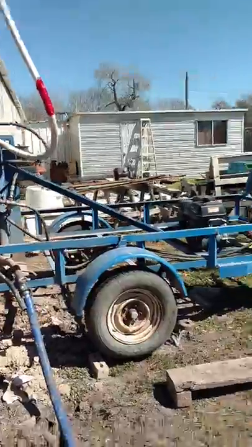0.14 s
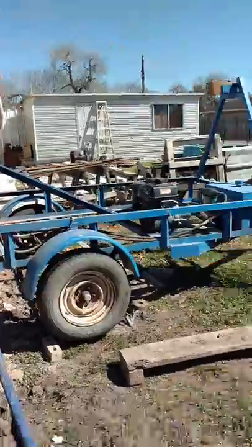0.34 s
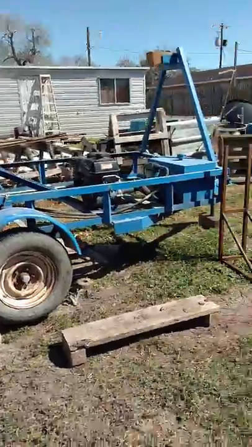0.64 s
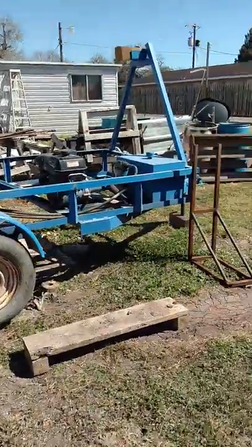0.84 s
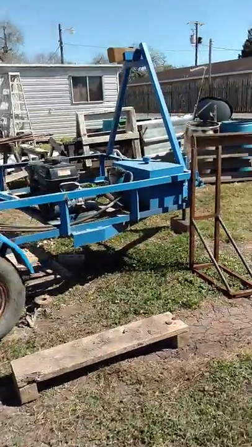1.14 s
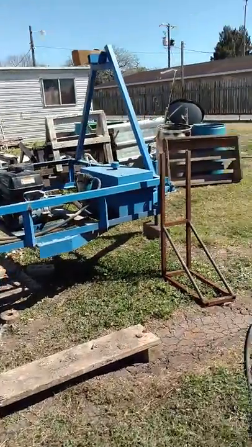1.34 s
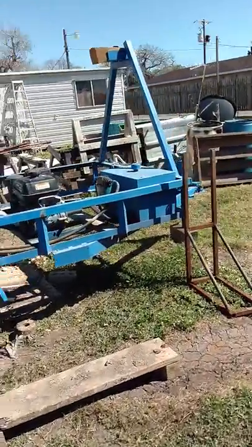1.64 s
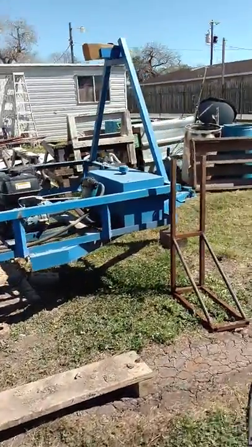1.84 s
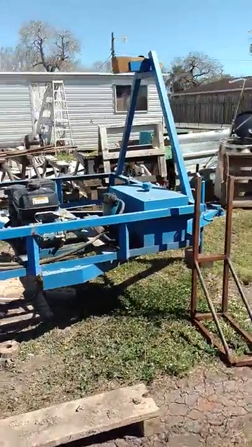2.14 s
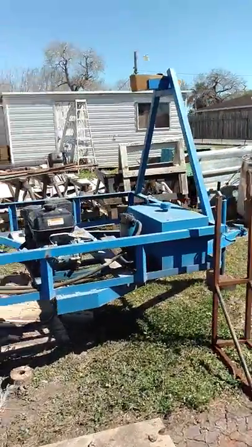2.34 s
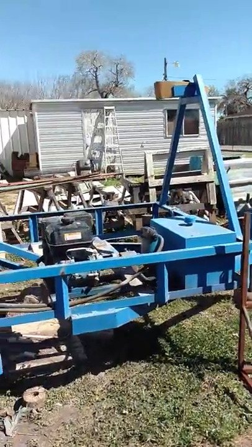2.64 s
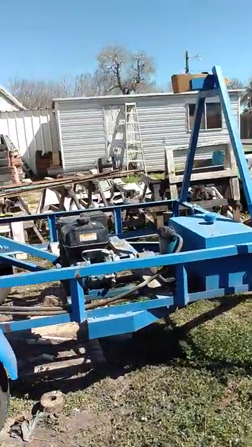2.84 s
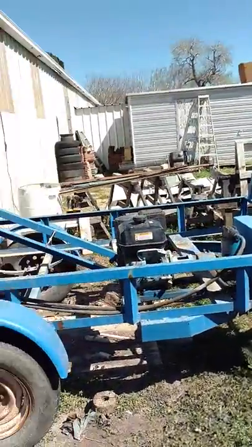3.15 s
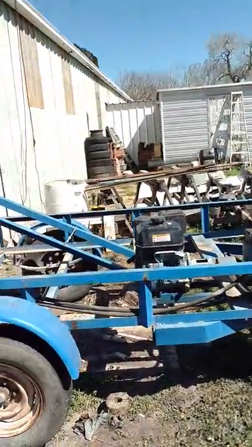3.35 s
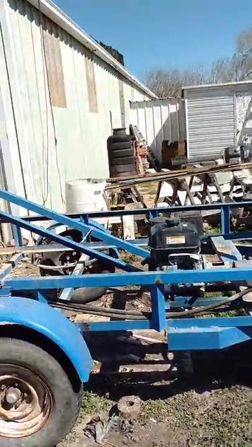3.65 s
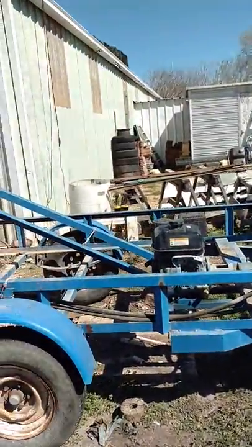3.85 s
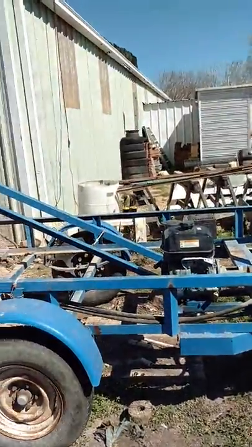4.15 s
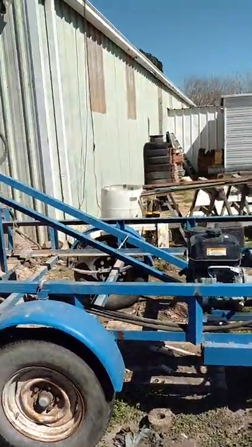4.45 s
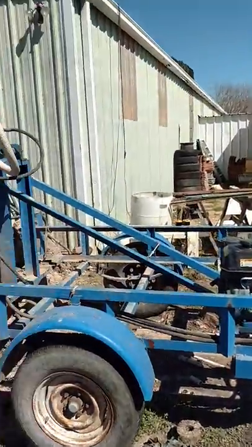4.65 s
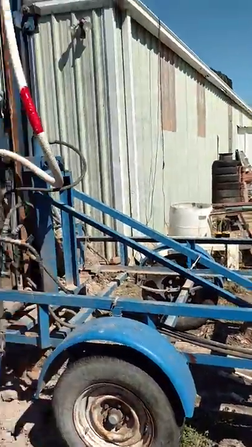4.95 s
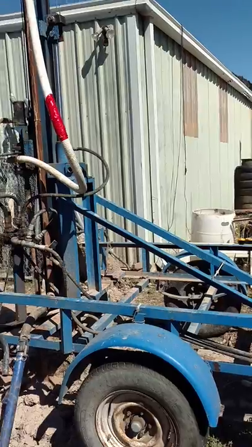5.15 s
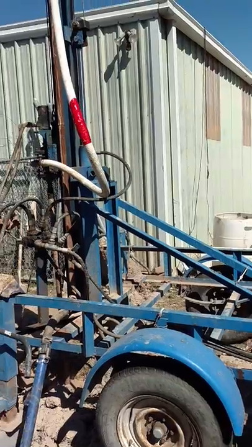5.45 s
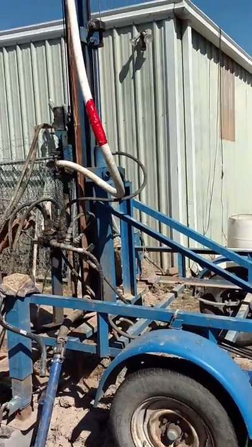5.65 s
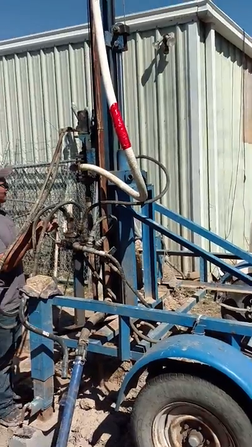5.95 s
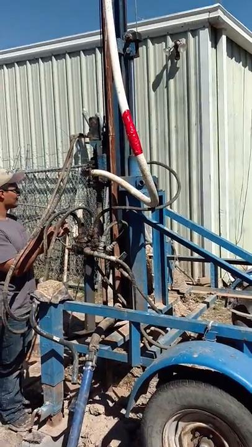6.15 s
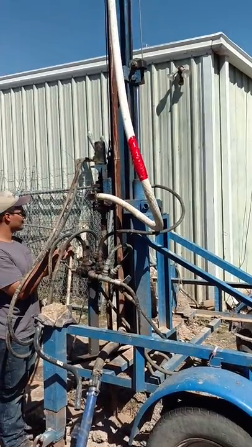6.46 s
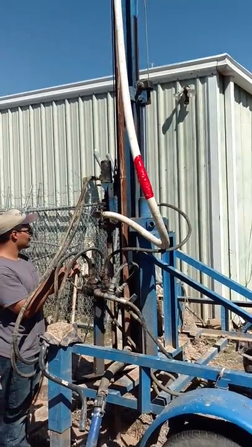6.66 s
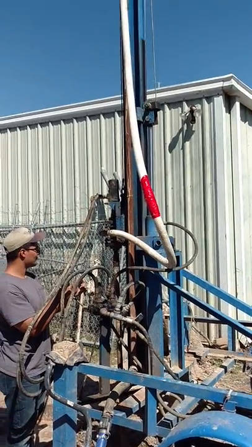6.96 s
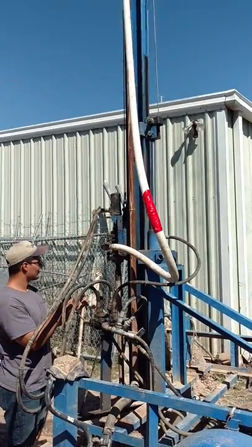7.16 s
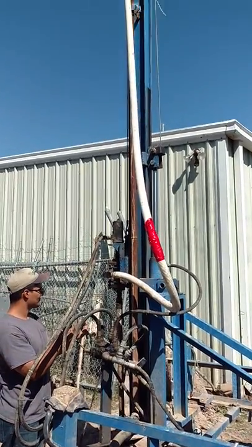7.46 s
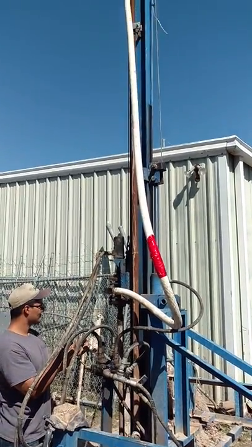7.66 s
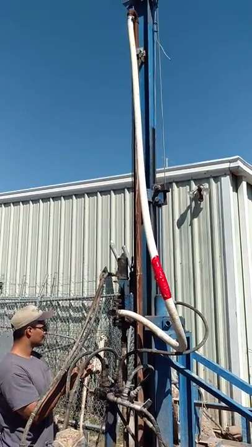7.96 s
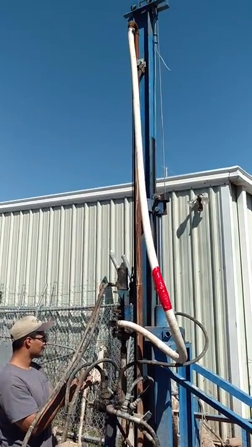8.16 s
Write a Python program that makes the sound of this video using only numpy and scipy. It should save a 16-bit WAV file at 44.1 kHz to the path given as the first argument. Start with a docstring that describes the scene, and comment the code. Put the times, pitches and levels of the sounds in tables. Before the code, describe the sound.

A drilling rig's petrol engine and slower pump engine throb and rattle together without pause in a yard, growing louder and more ringing mid-way, then easing slightly.

```python
"""Two engines of a home-made drilling rig chug, beat, knock and hiss in a yard, with a few steel clinks.
A single-cylinder petrol engine drives the hydraulics at about 3200 rpm; a slower one is likely the mud pump's.
Exhausts are sums of firing harmonics; the pump casing is a bank of struck resonances.
Gas flow, clatter and hiss are coloured noise pulsed by exhaust puffs and valve ticks.
The microphone is carried from the front of the trailer towards the mast, which moves levels, colour and width."""
import sys
import numpy as np
from scipy import signal
from scipy.fft import rfft, irfft, next_fast_len
from scipy.io import wavfile

SR = 44100
rng = np.random.default_rng(int(sys.argv[2]) if len(sys.argv) > 2 else 0)


def generate_wav(signal):
    """Clip the signal to [-1, 1] and save it as 16-bit WAV at the path in sys.argv[1]."""
    frames = np.transpose(np.atleast_2d(signal))
    scaled = np.clip(frames, -1, 1) * 32767
    pcm = np.round(scaled).astype(np.int16)
    wavfile.write(sys.argv[1], SR, pcm)


N = 366030
TIME = np.arange(N) / SR
PADDED = 2 * next_fast_len(N // 2 + 1)
FREQ = np.maximum(np.arange(PADDED // 2 + 1) * SR / PADDED, 1)

# governed speed of each engine: (time [s], rate [firings/s])
MAIN_SPEED = [(0, 26.84), (.5, 26.57), (1, 26.71), (1.5, 26.61), (2, 26.61), (2.4, 26.64), (2.9, 26.63),
              (3.4, 26.67), (3.9, 26.6), (4.4, 26.71), (5.4, 26.65), (6.3, 26.71), (6.8, 26.7),
              (7.3, 26.64), (7.8, 26.71), (8.3, 26.6)]
PUMP_SPEED = [(0, 22.97), (.5, 22.78), (1, 22.88), (1.5, 22.8), (2.4, 22.82), (2.9, 22.76), (3.4, 22.66),
              (3.9, 22.75), (4.4, 22.74), (4.9, 22.77), (5.4, 22.62), (5.9, 22.78), (6.3, 22.58),
              (6.8, 22.71), (7.3, 22.62), (7.8, 22.73), (8.3, 22.52)]
# main puff and weaker after-puffs of each main-engine firing: (share [cycle], level [dB])
MAIN_PUFFS = [(.04, 0), (.37, -3), (.87, -9)]
# machinery loudness along the walk, greatest beside the engines: (time [s], level [dB])
NEARNESS = [(0.1, -26.5), (1.5, -27.5), (3.3, -20), (4.84, -20), (8.2, -24.5)]
# ringing of casing and frame along the walk: (time [s], level [dB])
RING_LEVEL = [(0.1, -33), (1.7, -34), (2.6, -28), (3.2, -24.5), (3.7, -25), (4.1, -24), (5, -24),
              (5.4, -25), (5.8, -24), (6.3, -26.5), (6.9, -24.5), (7.3, -26.5), (8.199, -27)]


def turning(speed, start_cycles):
    """Cycles run through by a governed engine that hunts a little ahead of and behind its speed."""
    hunt_cycles, hunts_per_s = 0.0025, 2.0
    return start_cycles + np.cumsum(in_time(speed)) / SR + hunt_cycles * drift(hunts_per_s)


def engine_tones(main, pump, place):
    """Harmonics of both mufflers, and those that the frame picks out by resonance."""
    # muffler harmonics from the 2nd up: (level at the front [dB], level by the mast [dB])
    main_orders = [(-58, -55), (-57, -57), (-56, -56), (-37, -33.5), (-37.5, -35), (-41, -44), (-42, -42),
                   (-39.5, -32.5), (-34.5, -35.5), (-38.5, -39.5), (-54, -42), (-40, -37.5), (-44.5, -43.5),
                   (-43.5, -42.5), (-34.5, -41.5), (-41, -37.5), (-33, -44.5), (-36.5, -42), (-46, -44),
                   (-39.5, -35), (-33.5, -32.5), (-45, -47), (-50, -51), (-45, -41.5)]
    pump_orders = [(-70, -68), (-66, -60), (-61, -47), (-47, -39), (-48, -51.5), (-58, -57), (-61, -38.5),
                   (-54, -41), (-60, -48), (-64, -44), (-52, -34), (-68, -41), (-52, -40.5), (-48, -37.5),
                   (-49, -37.5), (-56, -41.5)]
    # one even level for the main engine's upper harmonics: (front [dB], mast [dB])
    upper_order = (-46.5, -49.5)
    upper_count = 7
    # frame resonances: (frequency [Hz], level far from the engines [dB], level beside them [dB])
    main_rings = [(880, -43, -35.5), (907, -48, -44), (933, -38, -45), (987, -41, -42), (1013, -42, -46),
                  (1040, -62, -35), (1067, -51, -46), (1120, -57, -38), (1520, -59, -38)]
    pump_rings = [(907, -52, -34), (998, -47, -34.5), (1021, -56, -33), (1043, -50, -30.5),
                  (1066, -52, -36), (1090, -54, -37.5), (1520, -51, -40), (1933, -67, -41),
                  (2029, -44, -43), (2065, -53, -41), (3720, -52, -42.5), (3794, -55, -47)]
    # dull puff and after-puff of the pump engine: (share [cycle], level [dB])
    pump_puffs = [(.08, 0), (.34, -4)]
    main_scatter_rad, pump_scatter_rad, ring_waver_rad = 1.1, 1.3, .2

    main_hz, pump_hz = in_time(MAIN_SPEED).mean(), in_time(PUMP_SPEED).mean()
    near = zero_to_one(RING_LEVEL)
    main_muffler = muffler_tones([*main_orders, *[upper_order] * upper_count])
    pump_muffler = muffler_tones(pump_orders)
    tones = exhaust(main, main_hz, main_muffler, MAIN_PUFFS, place, main_scatter_rad,
                    facing=0.82, uneven_db=0.6, waver_rad=0.19, left_lead_rad=1.0)
    tones += exhaust(pump, pump_hz, pump_muffler, pump_puffs, place, pump_scatter_rad,
                     facing=0, uneven_db=1.0, waver_rad=0.17, left_lead_rad=0.45)
    tones += exhaust(main, main_hz, frame_tones(main_rings, main_hz), MAIN_PUFFS, near, main_scatter_rad,
                     facing=0, uneven_db=0.5, waver_rad=ring_waver_rad, left_lead_rad=0.73)
    tones += exhaust(pump, pump_hz, frame_tones(pump_rings, pump_hz), pump_puffs, near, pump_scatter_rad,
                     facing=0, uneven_db=1.0, waver_rad=ring_waver_rad, left_lead_rad=0.81)
    return tones


def muffler_tones(orders):
    """Number the muffler harmonics: (multiple of the firing rate, front dB, mast dB)."""
    return [(k, *levels) for k, levels in enumerate(orders, 2)]


def frame_tones(rings, firing_hz):
    """The harmonic nearest each frame resonance: (multiple of the firing rate, far dB, near dB)."""
    return [(round(hz / firing_hz), *levels) for hz, *levels in rings]


def exhaust(cycles, firing_hz, orders, puffs, blend, scatter_rad, facing, uneven_db, waver_rad, left_lead_rad):
    """Firing puffs as harmonics: the lows chug together, reflections scatter the phases of the highs."""
    # how squarely the muffler mouth faces the microphone: (time [s], bark level [dB])
    bark_level = [(0, -4), (.9, -2.5), (1.3, 2.5), (2.1, 4), (3, -0.5), (4.5, -1), (6.5, 0), (7.5, 2),
                  (8.3, 2.5)]
    bark_hz, bark_octaves = 530, .6
    can_hz, can_width_hz = 560, 200  # the muffler's own resonance
    after_puff_hz, scatter_hz = 420, 750  # after-puffs are dull, scatter is steep, above these

    out, bark_db = np.zeros((2, N)), in_time(bark_level)
    for order, start_db, end_db in orders:
        shift, apart = rng.standard_normal(2)
        hz = order * firing_hz
        in_bark = facing * np.exp(-(np.log2(hz / bark_hz) / bark_octaves) ** 2)
        dulling = 1.5 + (hz / after_puff_hz) ** 2
        arrival = sum(from_db(db * dulling) * np.exp(-2j * np.pi * order * share) for share, db in puffs)
        can_lag = np.arctan((hz - can_hz) / (can_width_hz / 2))
        smear = scatter_rad * shift * (1 + (hz / scatter_hz) ** 4) * (1 - .4 * in_bark)
        bass_lag = 5 * np.log(order)  # lows leave the muffler later
        unsteady = waver_rad * np.sqrt(order / 20)  # low tones are the firmest
        fixed_phase = np.angle(arrival) - can_lag - bass_lag + smear
        phase = 2 * np.pi * order * cycles + fixed_phase + unsteady * drift(6.5)
        level_db = start_db + (end_db - start_db) * blend + in_bark * bark_db
        gain = np.sqrt(2) * from_db(level_db) * (1 + unsteady * drift(2.6))
        lead = (left_lead_rad + 0.37 * apart) / (1 + (order / 24) ** 2)
        out += gain * np.array([np.cos(phase + lead), np.cos(phase)])
    # no two firings burn alike
    strength = np.interp(cycles, np.arange(240), rng.standard_normal(240))
    return out * from_db(uneven_db * strength)


def knocking(cycles):
    """Piston, gears and pump strike the resonant casing at the same points of every cycle."""
    # contacts counted from the firing: (share [cycle], level [dB])
    knocks = [(.07, 1), (.25, 0), (.38, 1.5), (.56, 0), (.72, 0), (.87, 0)]
    # casing and frame resonances: (frequency [Hz], width [Hz], level [dB])
    casing = [(911, 31, -12.5), (1010, 32, -5.5), (1049, 53, -1), (1094, 54, -1), (1148.5, 25, -2),
              (1372, 62, -11), (1530, 60, -8.5), (1880, 62, -11.5), (1977, 130, -8.5), (3813, 45, -20)]
    strikes = np.array([contacts(cycles, knocks, jitter_s=.00016, uneven_db=1.9) for _ in range(2)])
    drive = rms_one(strikes) + .5 * rng.standard_normal((2, N))
    rings = np.zeros((2, N))
    for k, (hz, width_hz, level_db) in enumerate(casing):
        rings += (-1) ** k * from_db(level_db) * resonate(drive, hz, width_hz)
    return coloured(rings) * heard_at(-29, 1.3, RING_LEVEL)


def clatter_and_hiss(main, pump):
    """Rocker cover, fan shroud and cooling fins sound in their own ranges; pump rattle bunches the clatter."""
    # loose pump parts rattling in clumps: (share [cycle], level [dB])
    rattles = [(.08, -2), (.3, 0), (.38, -2), (.96, -3)]
    # noise colours: (frequency [Hz], density [dB per Hz])
    clatter_colour = [(600, -55), (950, -4), (1150, -3), (1260, -2), (1450, -1.5), (1720, -4.5), (2100, -1),
                      (2500, -2), (3100, -6), (3700, -5), (4200, -12.5), (5000, -17.5), (7000, -37)]
    hiss_colour = [(2000, -22), (3500, -3), (4800, -0.5), (5800, 0), (6600, -1), (7000, 2), (7800, -4),
                   (9000, -8), (11000, -26), (15000, -33)]
    sizzle_colour = [(5000, -46), (7500, 3), (9000, 2), (10000, 8.5), (12500, -3.5), (15000, -13),
                     (16000, -0.5)]
    rattle_share = .45
    rattle = bursts(contacts(pump, rattles, jitter_s=.0004, uneven_db=1.0), decay_s=.0075)
    chop = np.sqrt((1 + rattle_share * rattle) / (1 + rattle_share))
    clatter = chop * valve_rush(main, clatter_colour, grit_db=1.0, tick_share=0.097)
    hiss = valve_rush(main, hiss_colour, grit_db=1.1, tick_share=1.0)
    sizzle = valve_rush(main, sizzle_colour, grit_db=3.0, tick_share=1.3)
    treble = hiss + from_db(-6.5) * sizzle
    return clatter * heard_at(-23.5, 0.86) + treble * heard_at(-31.5, 0.046)


def valve_rush(cycles, colour, grit_db, tick_share):
    """Gritty rush of valve gear and cooling air that jumps at each valve tick."""
    # contacts counted from the firing: (share [cycle], level [dB])
    valve_ticks = [(.02, 0), (.08, -1.5), (.34, -5), (.63, -1.5), (.81, -7)]
    ticks = bursts(contacts(cycles, valve_ticks, jitter_s=0.0001, uneven_db=3.5), decay_s=0.011)
    return coloured(gritty_noise(grit_db) * np.sqrt(1 + tick_share * ticks), over_freq(colour))


def rumble(cycles):
    """Turbulent gas noise leaves the muffler, swelling at each puff and after-puff."""
    # noise colour: (frequency [Hz], density [dB per Hz])
    rumble_colour = [(25, -40), (60, -25), (110, -38), (200, -6), (330, -8), (480, -13), (600, -1),
                     (700, 2), (950, -5), (1150, -19.5), (1500, -19), (3000, -30)]
    puffs = bursts(contacts(cycles, MAIN_PUFFS, jitter_s=0.00047, uneven_db=5.0), decay_s=0.0038)
    flow = coloured(rng.standard_normal((2, N)) * np.sqrt(1 + 0.36 * puffs), over_freq(rumble_colour))
    return flow * heard_at(-26.5, 0.73)


def clinks():
    """Short hard taps of loose steel: decaying noise through one broad resonance."""
    # strikes: (time [s], level at the strike [dB])
    strikes = [(1.647, -10), (4.9874, -13), (5.3244, -18), (7.1484, -20)]
    # noise colour: (frequency [Hz], density [dB per Hz])
    clink_colour = [(150, -30), (500, -2), (1200, 0), (4000, -6), (12000, -20)]
    decay_s = 0.0015
    envelope = np.zeros(N)
    for s, level_db in strikes:
        envelope += from_db(level_db) * (TIME >= s) * np.exp(-np.abs(TIME - s) / decay_s)
    noise = coloured(rng.standard_normal((2, N)), over_freq(clink_colour))
    return resonate(envelope * noise, hz=1400, width_hz=5000)


def microphone_pair(pair, place):
    """Mix two unrelated noises as mid and side, so left and right are alike or opposed by frequency."""
    hz, s, frames = signal.stft(pair, SR, nperseg=512)
    hz = hz[:, None]
    alike = channel_likeness(hz, s)
    colour = from_db(trailer_colour_db(hz, s, place))
    mid_side = frames * colour * np.sqrt([1 + alike, 1 - alike])
    mid, side = signal.istft(mid_side, SR)[1][:, :N]
    return np.array([mid + side, mid - side]) / np.sqrt(2)


def channel_likeness(hz, s):
    """Left-right correlation: a table in the bass, above it a swing that opposes at multiples of one pitch."""
    # bass correlation: (frequency [Hz], likeness [-1..1])
    bass_likeness = [(50, .5), (300, 0.97), (700, 0.8), (1000, 0.89), (1300, 1), (1700, 0.44), (2050, 0.26)]
    # how fully the channels oppose: (frequency [Hz], far from the engines [0..1], beside them [0..1])
    swing_depth = [(2600, .94, .89), (5200, .98, .97), (7800, .98, .985), (13000, .98, .98)]
    # hollows that move as the microphone turns:
    # (time [s], upper frequency [Hz], upper depth [dB], lower depth [dB])
    hollows = [(0, 5400, 20, 6), (.85, 5380, 22, 14), (1.25, 5230, 18, 9), (1.55, 5050, 14, 5),
               (2.05, 4970, 15, 2), (2.35, 5100, 2, 0), (3.7, 5200, 3, 0), (4.6, 5200, 0, 0),
               (5, 5300, 8, 0), (5.4, 5200, 5, 0), (5.8, 5100, 14, 1), (6.6, 5120, 12, 3),
               (7.4, 5020, 16, 7), (7.7, 5100, 3, 11), (8.3, 5170, 2, 10)]
    swing_hz, slide_reach_hz = 2582, 1500
    upper_width_hz, lower_width_hz = 270, 160

    at_s, *columns = np.transpose(hollows)
    upper_hz, upper_db, lower_db = [np.interp(s, at_s, column) for column in columns]
    slide_hz = (upper_hz - 2 * swing_hz) * np.exp(-((hz - 2 * swing_hz) / slide_reach_hz) ** 2)
    hollow_db = upper_db * np.exp(-((hz - upper_hz) / upper_width_hz) ** 4)
    hollow_db = hollow_db + lower_db * np.exp(-((hz - swing_hz) / lower_width_hz) ** 2)

    depth_hz, far_off, beside = np.transpose(swing_depth)
    near = np.interp(s, TIME, zero_to_one(NEARNESS))
    depth = np.interp(hz, depth_hz, far_off) * (1 - near) + np.interp(hz, depth_hz, beside) * near
    mid_power = 1 - depth * np.cos(2 * np.pi * (hz - slide_hz) / swing_hz)
    swing = mid_power * from_db(-hollow_db) ** 2 - 1
    bass = np.interp(hz, *np.transpose(bass_likeness))
    return np.clip(np.where(hz < bass_likeness[-1][0], bass, swing), -1, .99)


def trailer_colour_db(hz, s, place):
    """Noise colour along the walk: one tilt fades out from the front, another comes in at the mast."""
    # colour at the trailer front, against beside the mast: (frequency [Hz], level [dB])
    front_colour = [(100, -1), (200, 1), (400, 1), (750, -6), (950, 0), (1450, 6.5), (2000, -1),
                    (2600, 2.5), (3500, 1), (4600, 0.5), (5800, -2.5), (8000, 1), (12500, 3.5), (14000, 9)]
    # colour under the mast: (frequency [Hz], level [dB])
    mast_colour = [(300, 4), (520, 0), (800, 0.5), (1050, 2.5), (1700, 0.5), (2050, -2), (2400, -0.5),
                   (2900, 3), (3700, -3.5), (5100, 1.5), (7000, 0), (9000, 2.5), (15000, 2)]
    # turn of the microphone to the mast: (time [s], turn [0..1])
    turn = [(4.3, 0.15), (5.6, 0.76), (7.6, 1)]
    front = 1 - np.interp(s, TIME, place)
    turned = np.interp(s, *np.transpose(turn))
    front_db = np.interp(hz, *np.transpose(front_colour)) * front
    return front_db + np.interp(hz, *np.transpose(mast_colour)) * turned


def ground_bounce(x, place):
    """A delayed bounce off the ground combs the noise as the microphone moves."""
    lag_s, bounce = .0017 + .0006 * place + .00004 * drift(.7), .2
    delayed = np.array([np.interp(TIME - lag_s, TIME, side) for side in x])
    return (x + bounce * delayed) / np.hypot(1, bounce)


def bass_hollow(x):
    """Reflections reshape a narrow stretch of the bass, a different one at each spot of the walk."""
    # (time [s], centre [Hz], depth [dB, negative = boost])
    hollow = [(0, 300, 7), (.75, 295, 3), (1.15, 215, 0.5), (1.5, 190, 10), (2, 196, 3), (2.3, 260, 1.5),
              (2.7, 300, 1.5), (3, 390, 0), (3.5, 420, 0.5), (4.15, 480, -1), (4.7, 506, -3.5)]
    width_octaves = 0.24
    hz, s, frames = signal.stft(x, SR, nperseg=4096)
    at_s, centre_hz, depth_db = np.transpose(hollow)
    octaves = np.log2(np.maximum(hz, 1)[:, None] / np.interp(s, at_s, centre_hz))
    loss_db = np.interp(s, at_s, depth_db) * np.exp(-(octaves / width_octaves) ** 2)
    return signal.istft(frames * from_db(-loss_db), SR)[1][:, :N]


def unsteady_level():
    """Gain of the whole sound: brief dips, falling fast and recovering more slowly, on a chance flutter."""
    # (time [s], length [s], depth [dB])
    dips = [(0.223, 0.053, 1), (0.52, 0.14, 1.5), (1.342, 0.48, 0.5), (2.68, 0.48, 1), (3.448, 0.22, 1.5),
            (4.17, 0.067, 2), (4.493, 0.13, 2.5), (5.05, 0.079, 1.5), (5.624, 0.12, 2.5),
            (5.946, 0.52, 1.2), (6.67, 0.15, 1.2), (7.234, 0.061, 3), (7.493, 0.18, 2)]
    fall_s, recover_s = 0.021, 0.085
    level_db = .38 * drift(4.3)
    for s, length_s, depth_db in dips:
        fall = (TIME - s) / fall_s
        recover = 1 - (TIME - s - length_s) / recover_s
        level_db = level_db - depth_db * np.clip(np.minimum(fall, recover), 0, 1)
    return from_db(level_db)


def heard_at(level_db, follows, curve=NEARNESS):
    """Gain of a part: mean level in dB, plus `follows` dB for each dB of the walk curve."""
    curve_db = in_time(curve)
    return from_db(level_db + follows * (curve_db - curve_db.mean()))


def contacts(cycles, pattern, jitter_s, uneven_db):
    """One click per contact of each cycle, a little uneven in time and strength."""
    clicks, whole = np.zeros(N), np.arange(-1, 230)
    for share, level_db in pattern:
        late, strong = rng.standard_normal((2, len(whole)))
        at_s = np.interp(whole + share, cycles, TIME, left=-1, right=-1) + jitter_s * late
        at = (at_s * SR).astype(int)
        inside = (at >= 0) & (at < N)
        clicks[at[inside]] += from_db(level_db + uneven_db * strong[inside])
    return clicks


def bursts(clicks, decay_s):
    """Power envelope in which each click opens a burst that dies away; mean one."""
    power = signal.lfilter([1], [1, -np.exp(-1 / (decay_s * SR))], clicks ** 2 + 1e-18)
    return power / power.mean()


def gritty_noise(grit_db):
    """Two noises whose shared level jumps by chance every 16 samples, like tiny uneven impacts."""
    grit = np.repeat(rng.standard_normal(N // 16 + 1), 16)[:N]
    return rng.standard_normal((2, N)) * from_db(grit_db * grit)


def coloured(pair, colour_db=0):
    """Filter a pair of signals by one spectrum in dB; rms one over both."""
    return rms_one(irfft(rfft(pair, PADDED) * from_db(colour_db))[:, :N])


def resonate(x, hz, width_hz):
    """One two-pole resonance with a gain of about one at its top."""
    r = np.exp(-np.pi * width_hz / SR)
    zeros = np.array([1, 0, -1]) * (1 - r * r) / 2
    return signal.lfilter(zeros, [1, -2 * r * np.cos(2 * np.pi * hz / SR), r * r], x)


def drift(rate_hz):
    """Smooth chance of spread one that changes about `rate_hz` times a second."""
    step = 100  # samples between slow points
    r = np.exp(-2 * step * np.pi * rate_hz / SR)
    slow = signal.lfilter([1], [1, -2 * r, r * r], rng.standard_normal(N // step + 1002))[1000:]
    return np.interp(np.arange(N) / step, np.arange(len(slow)), rms_one(slow))


def from_db(db):
    """Decibels to gain."""
    return 10 ** (np.asarray(db) / 20)


def rms_one(x):
    """Scale to an rms of one."""
    return x / np.sqrt(np.mean(x ** 2) + 1e-20)


def in_time(rows):
    """A curve of (time [s], value) at every sample."""
    return np.interp(TIME, *np.transpose(rows))


def zero_to_one(rows):
    """A curve at every sample, from 0 at its lowest to 1 at its highest."""
    curve = in_time(rows)
    return (curve - curve.min()) / np.ptp(curve)


def over_freq(points):
    """A table of (frequency [Hz], value) at every bin, straight in log frequency."""
    hz, value = np.transpose(points)
    return np.interp(np.log(FREQ), np.log(hz), value)


def scene():
    """Both engines at once along the walk; their bass leans to the right."""
    # (time [s], place [0 = front of the trailer, 1 = beside the mast])
    walk = [(0, 0.013), (1.1, 0.13), (1.9, 0.61), (2.6, 0.91), (3.2, 0.92), (5, 1), (8.3, 0.97)]
    # (frequency [Hz], left minus right [dB])
    balance = [(60, -10), (150, -9.5), (350, -9), (600, -12), (850, -4.5), (1050, -4), (1300, 0.5),
               (2000, 0.5), (3000, -0.5), (6000, 0.5), (10000, 2.5), (15000, 0.5)]
    main = turning(MAIN_SPEED, start_cycles=.074)
    pump = turning(PUMP_SPEED, start_cycles=-.595)
    place = np.clip(in_time(walk), 0, 1)
    tones = engine_tones(main, pump, place)
    noise = rumble(main) + knocking(pump) + clatter_and_hiss(main, pump) + clinks()
    heard_noise = ground_bounce(microphone_pair(noise, place), place)
    mix = bass_hollow(tones + heard_noise) * unsteady_level()
    sides = from_db(over_freq(balance) * np.array([[1], [-1]]) / 2)
    sides = sides / np.sqrt(np.mean(sides ** 2, axis=0))  # keep the power of the pair
    return irfft(rfft(mix, PADDED) * sides)[:, :N]


def record(dry):
    """Cut the top steeply with an elliptic low-pass."""
    cutoff_hz = 15200
    return signal.sosfilt(signal.ellip(12, .2, 80, cutoff_hz, fs=SR, output="sos"), dry)


dry = scene()
out = record(dry)
generate_wav(out)
```